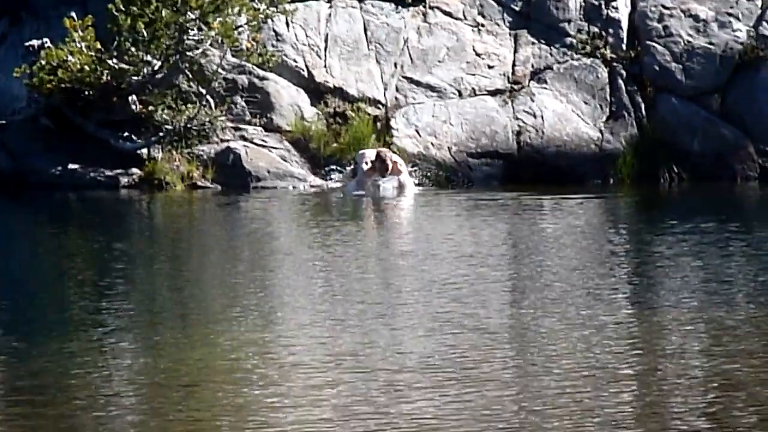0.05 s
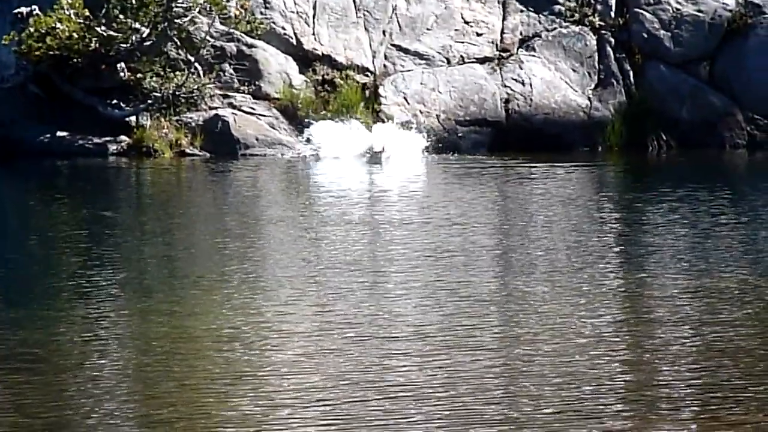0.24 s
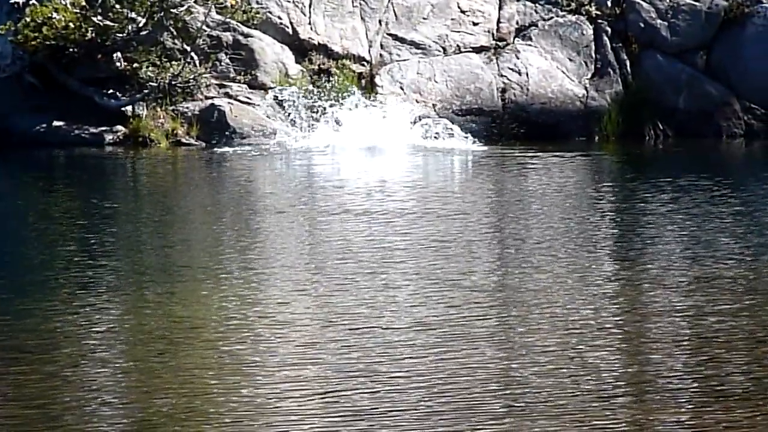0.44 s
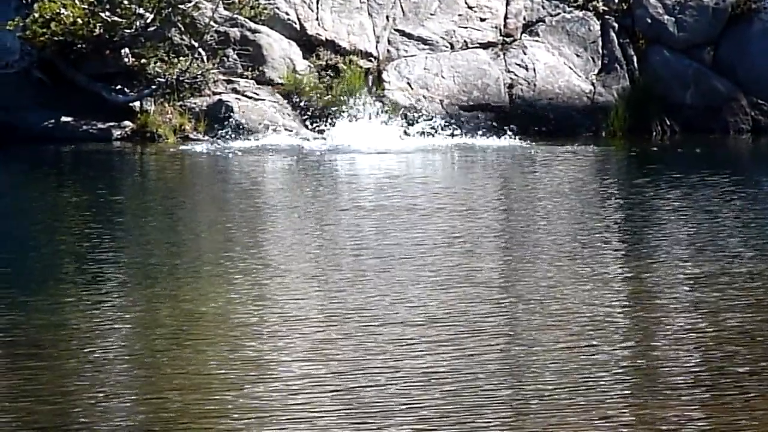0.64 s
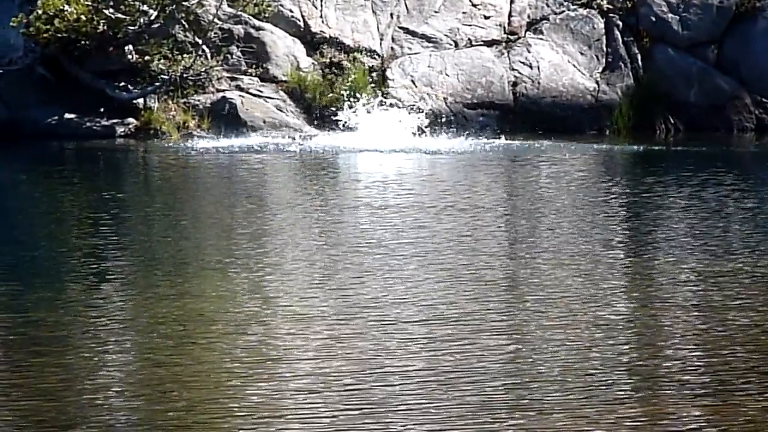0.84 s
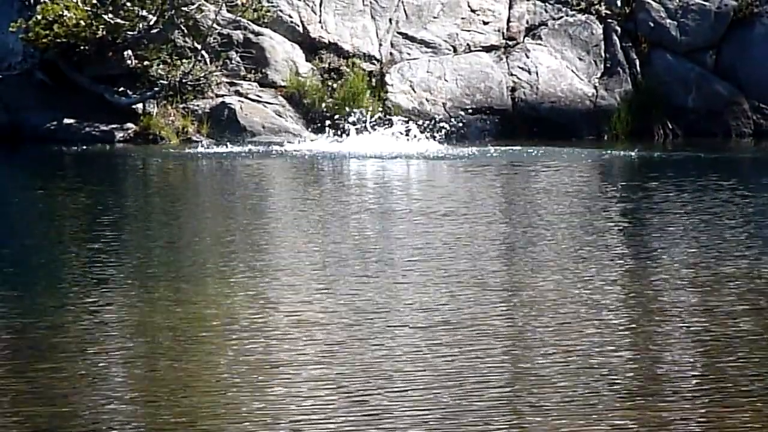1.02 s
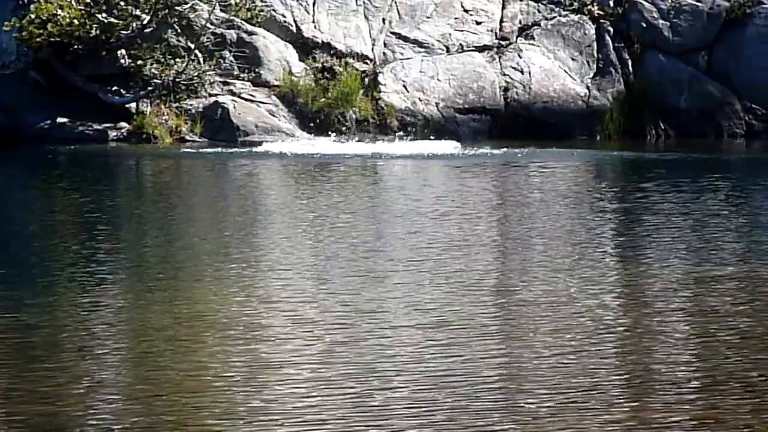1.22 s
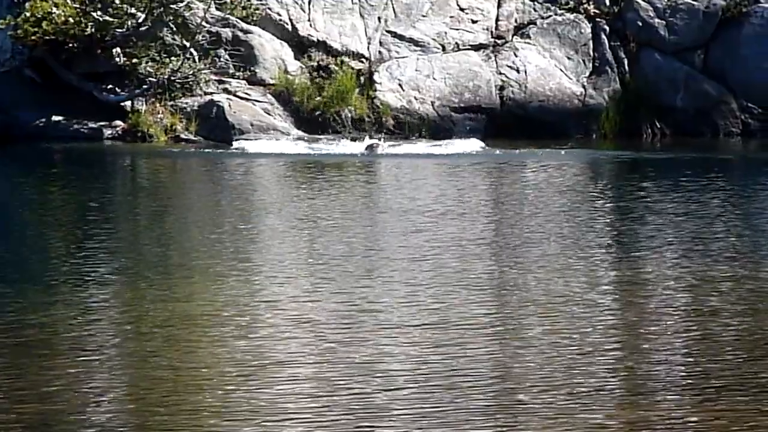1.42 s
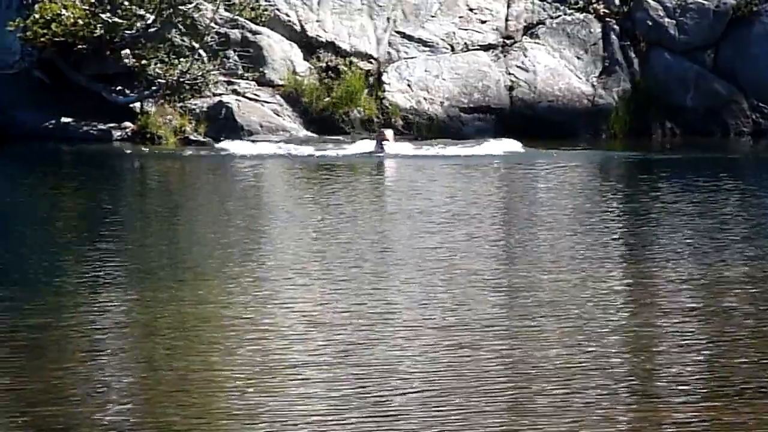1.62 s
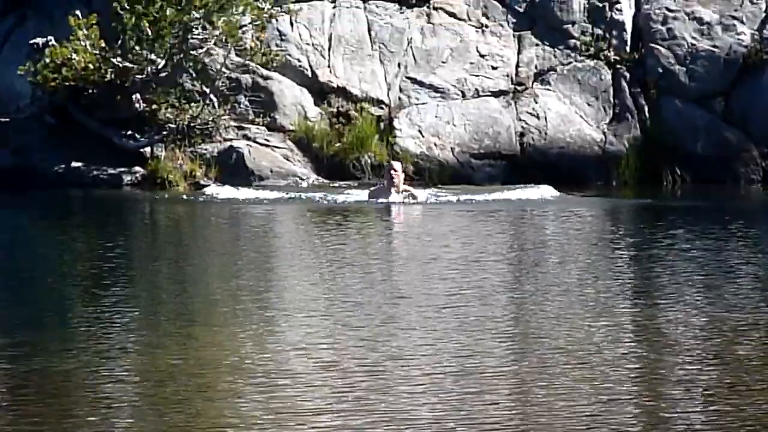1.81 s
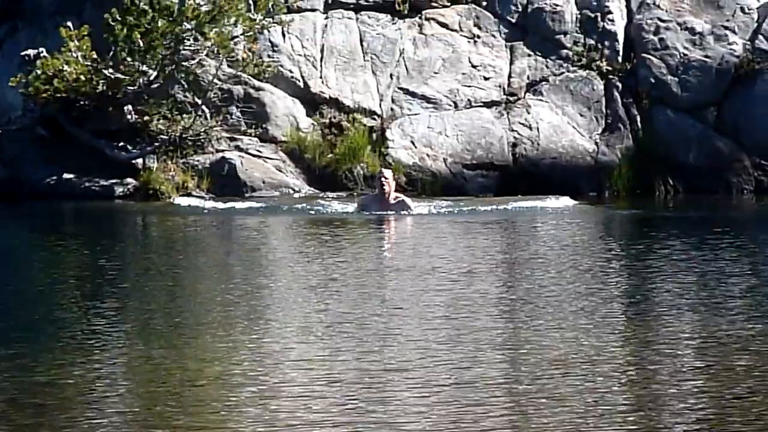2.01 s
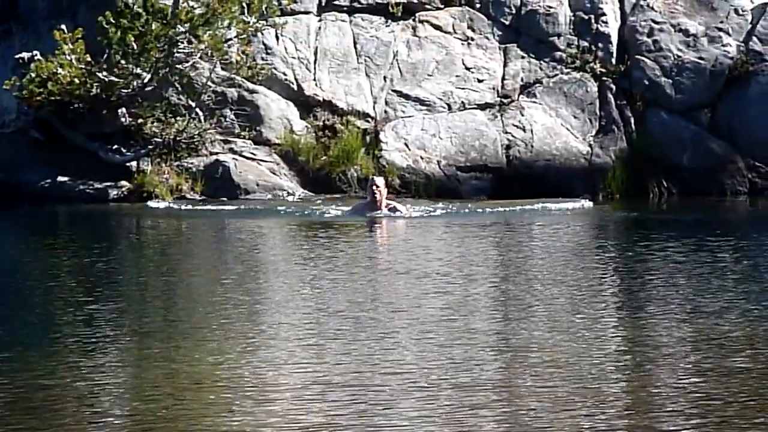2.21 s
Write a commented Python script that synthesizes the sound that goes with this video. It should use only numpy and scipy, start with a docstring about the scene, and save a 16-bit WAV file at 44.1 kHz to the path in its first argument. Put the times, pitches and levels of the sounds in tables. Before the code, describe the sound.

A person splashes into a lake with a sharp smack, heard from across the water. Spray patters down and the churned water gurgles and plops, then thins out over faint running water, with a short echo off rocks.

```python
"""A person plunges into a calm lake below a rock face, heard from across the water.
Running water and a faint breeze set the bed. A few light plops and slaps lead in, then at 0.33 s
the body hits with a crack and the cavity collapses in low gulps. Thrown spray rains back and bubbles
plop in the wash, each sound hollowed by its mirror image off the lake and echoed by the rocks.
The wash thins out, and a puff of air brushes the microphone at the very end."""
import sys
import numpy as np
from scipy import signal
from scipy.fft import rfft, irfft
from scipy.io import wavfile

SR = 44100
rng = np.random.default_rng(int(sys.argv[2]) if len(sys.argv) > 2 else 0)


def unload_wav(signal):
    """Save mono or channel-first audio to the path in sys.argv[1] as 16-bit WAV at rate SR, clipped to [-1, 1]."""
    wavfile.write(
        sys.argv[1],
        SR,
        np.round(np.clip(np.atleast_2d(signal).T, -1, 1) * 32767).astype(np.int16),
    )


N = 103635
T = np.arange(N) / SR
HZ = np.fft.rfftfreq(2 * N, 1 / SR)


def undb(db):
    """Decibels to gain."""
    return 10 ** (np.asarray(db) / 20)


def unit(x):
    """Scale to rms 1."""
    return x / np.sqrt(np.mean(x ** 2))


def fader(points):
    """Gain ride through (t/s, level/dB) points."""
    return undb(np.interp(T, *np.array(points).T))


def eq(x, points):
    """Filter through (f/Hz, level/dB) points."""
    hz, db = np.array(points).T
    gain = undb(np.interp(np.log(HZ + 1), np.log(hz), db))
    return irfft(rfft(x, 2 * N) * gain)[..., :N]


def drift(rate_hz):
    """Slow random modulation with a spread near 1."""
    return np.interp(T * rate_hz, np.arange(400), rng.standard_normal(400))


def add(out, start, sound):
    """Mix a short sound in at its cue time."""
    i = int(np.clip(start * SR, 0, N))
    out[i:i + len(sound)] += sound[:N - i]


def patter(per_s, spread_db):
    """Dense clicks of uneven size, the grain of splashing water."""
    hits = rng.random(N) < per_s / SR
    size = np.minimum(rng.standard_normal(N), 2)
    polarity = np.sign(rng.standard_normal(N))
    return hits * polarity * undb(spread_db * size)


def bubble(hz, decay, attack, rise):
    """A ringing bubble nears the surface: its pitch climbs by the share `rise` per decay time."""
    t = np.arange(int(7 * decay * SR)) / SR
    envelope = (1 - np.exp(-(t / attack) ** 2)) * np.exp(-t / decay)
    phase = 2 * np.pi * hz * t * (1 + rise * t / decay / 2)
    return envelope / envelope.max() * np.sin(phase)


# Tone of a bubble cloud: f/Hz, level/dB
CLOUD_EQ = [(100, -5), (420, -4.5), (680, 2.5), (900, -1.5), (1200, 2.5), (3000, 4)]
def bubble_cloud(per_s, centre_hz, octaves, decay_cycles, spread_db):
    """Bubbles of many sizes ring at random times, the small ones higher and shorter; rms 1."""
    out = np.zeros(N)
    starts = rng.random(8000) * N / SR
    scatter = np.clip(rng.standard_normal((8000, 2)), -2.5, [2.5, 1.7])
    for start, (pitch, level) in zip(starts[:int(per_s * N / SR)], scatter):
        hz = centre_hz * 2 ** (octaves * pitch)
        ring = bubble(hz, decay=decay_cycles / hz, attack=0.5 / hz, rise=0.07)
        add(out, start, undb(spread_db * level) * ring)
    return unit(eq(out, CLOUD_EQ))


# Low rumble of air on the microphone: f/Hz, level/dB
BREEZE_EQ = [(20, -5), (60, 15), (150, 27), (260, 14), (600, -38), (2000, -70)]
def breeze(level_db=-75.5, gust_db=4, puff_db=-51, puff_at_s=2.342, puff_width_s=0.012):
    """Light air buffets each microphone port, with one stronger puff."""
    gusts = undb(level_db + gust_db * drift(rate_hz=21))
    puff = undb(puff_db) * np.exp(-0.5 * ((T - puff_at_s) / puff_width_s) ** 2)
    return (gusts + puff) * unit(eq(rng.standard_normal((2, N)), BREEZE_EQ))


# Tone of the rushing water: f/Hz, level/dB
RUSH_EQ = [(30, -33), (120, -33), (220, -11.5), (340, -5), (680, 0.5), (930, -8.5), (1220, -5),
           (1500, -10.5), (2100, -10), (3200, -11), (6000, -16), (10000, -20), (15500, -26.5)]
# Stereo width of the rush, side over mid: f/Hz, level/dB
RUSH_WIDTH = [(100, 1), (350, 1.5), (650, 0.5), (950, 8.5), (1200, 5.5), (2000, 7.5), (3000, 4), (4500, 4),
              (7000, 2.5), (11000, 0.5), (15000, 1)]
def stream(rush_db=-53.5, flicker_db=0.26, trickle_db=-60, right_lag_s=0.000053):
    """A bed of running water: a wide rush with small bubbles trickling off to the left."""
    def rush():
        gain = undb(rush_db + flicker_db * drift(rate_hz=13.84))
        return gain * unit(eq(patter(per_s=12000, spread_db=2.5), RUSH_EQ))

    mid, side = rush(), eq(rush(), RUSH_WIDTH)
    cloud = bubble_cloud(per_s=500, centre_hz=652, octaves=0.601, decay_cycles=2.06, spread_db=8)
    trickle = undb(trickle_db) * cloud
    late_trickle = np.interp(T - right_lag_s, T, trickle)
    return np.array([mid + side + trickle, mid - side + late_trickle])


def lake_mirror(x, delay_s=0.001717, gain=0.62, cutoff_hz=2880):
    """The surface adds a close, duller reflection that comb-filters the sound hollow."""
    reflection = gain * np.exp(-2j * np.pi * HZ * delay_s) / (1 + (HZ / cutoff_hz) ** 2)
    return irfft(rfft(x, 2 * N) * (1 + reflection))[:N] / np.hypot(1, gain)


def rock_echo(x, t60_s=0.66, build_s=0.0032):
    """The rocks scatter a short, diffuse tail to both sides; wet signal only."""
    envelope = np.exp(-np.log(1000) * T / t60_s) * (1 - np.exp(-T / build_s))
    tail = unit(rng.standard_normal((2, N)) * envelope) / np.sqrt(N)
    wet = signal.fftconvolve(x[None], tail, axes=1)[:, :N]
    return eq(wet, [(600, -11.5), (3000, -8.5)])


# Swells as cavities open and close: t/s, level/dB, width/s
GULP_CUES = [(0.322, -54, 0.023), (0.436, -55, 0.052), (0.614, -59, 0.044), (0.75, -51.5, 0.065),
             (1.121, -58, 0.075), (1.48, -63, 0.019)]
# Dark body of a gulp: f/Hz, level/dB
GULP_EQ = [(25, -48), (60, -23), (110, -11), (190, -6.5), (290, 6), (700, -15), (2000, -48)]
def gulps():
    """The low end: heavy water closes over the cavities with a soft rumble."""
    swell = sum(undb(db) * np.exp(-0.5 * ((T - at) / width) ** 2) for at, db, width in GULP_CUES)
    return swell * unit(eq(rng.standard_normal(N), GULP_EQ))


# Surges of the churned water: t/s, level/dB
CHURN_RIDE = [(.15, -70), (.22, -56), (.29, -51), (.37, -45), (.48, -50.5), (.62, -52), (.76, -46),
              (.92, -49), (1.07, -52), (1.31, -49), (1.48, -54), (1.68, -66.5), (2.02, -54), (2.2, -60.5),
              (2.35, -83)]
def churn():
    """The churned water fizzes and gurgles with small bubbles."""
    cloud = bubble_cloud(per_s=1400, centre_hz=801.3, octaves=0.539, decay_cycles=4.47, spread_db=0)
    return fader(CHURN_RIDE) * cloud


# Showers of falling drops: t/s, level/dB
SPRAY_RIDE = [(0, -72), (.28, -54), (.38, -46), (.46, -65.5), (.6, -57), (.72, -50), (.85, -45.5),
              (.95, -48.5), (1.08, -55), (1.2, -52.5), (1.32, -49), (1.5, -59), (1.7, -60), (1.95, -60.5),
              (2.35, -76)]
# Bright tone of drops on water: f/Hz, level/dB
SPRAY_EQ = [(60, -24.5), (250, -34), (600, -29), (1200, 3.5), (2200, -3), (3300, -1.5), (5000, -11.5),
            (9000, -17.5), (16000, -28)]
def spray():
    """Thrown spray rains back on the lake, a tick for each drop."""
    return fader(SPRAY_RIDE) * unit(eq(patter(per_s=4600, spread_db=-4), SPRAY_EQ))


# Air pockets, from deep collapsing cavities to small plops: t/s, f/Hz, level/dB, decay/s
PLOP_CUES = [(.042, 560, -50.5, 0.0017), (.14, 748, -42, 0.0087), (0.197, 467, -41.5, 0.012),
             (.326, 390, -33, 0.0023), (.329, 1140, -28.5, 0.0027), (.3412, 625, -29.5, 0.0065),
             (.375, 1145, -43, 0.02), (.444, 576, -36, 0.0086), (.519, 622, -39, 0.0025),
             (.598, 663, -39.5, 0.0085), (.655, 91, -66, .028), (.711, 590, -41, 0.017),
             (0.712, 205, -51, 0.008), (.735, 118, -66, 0.03), (.758, 1150, -45.5, 0.037),
             (0.777, 261, -44.5, 0.016), (0.799, 147, -59, 0.027), (0.825, 1103, -39.5, 0.0077),
             (.865, 547, -38, 0.0091), (0.929, 166, -58, .008), (.99, 575, -41, 0.0098),
             (1.102, 710, -51, 0.0042), (1.1515, 625, -35.5, 0.0023), (1.187, 596, -41, 0.0085),
             (1.286, 540, -42.5, 0.0094), (1.315, 1163, -43, 0.0091), (1.657, 1660, -46.5, 0.0032),
             (1.83, 830, -42, 0.0035), (1.971, 1260, -45, .006), (2.02, 1194, -52, 0.0056),
             (2.272, 1670, -50.5, 0.0027)]
def plops():
    """Each trapped air pocket rings as one short, rising note."""
    out = np.zeros(N)
    for start, hz, db, decay in PLOP_CUES:
        add(out, start, undb(db) * bubble(hz, decay, attack=0.001, rise=0.0605))
    return out


# Hits of the body and of thrown water on the surface: t/s, level/dB, decay/s
SLAP_CUES = [(0.171, -47, 0.017), (0.305, -48, 0.017), (0.3266, -32.5, 0.013), (.341, -37, 0.018),
             (0.358, -42, 0.02), (0.811, -46, 0.084), (0.942, -45.5, 0.014), (1.021, -50, 0.022),
             (1.285, -59, .014), (1.318, -47, 0.018), (1.446, -49, 0.019)]
# Midrange smack of a slap: f/Hz, level/dB
SLAP_EQ = [(100, -39), (400, -9.5), (700, 7.5), (1200, 1), (2200, -3.5), (3500, 1.5), (6000, -8.5),
           (10000, -15.5), (16000, -24)]
def slaps(attack_s=0.00094):
    """Each slap on the surface bursts into a dense crackle that dies quickly."""
    envelope = np.zeros(N)
    for start, db, decay in SLAP_CUES:
        age = np.maximum(T - start, 0)
        envelope += undb(db) * (1 - np.exp(-age / attack_s)) * np.exp(-age / decay)
    return envelope * unit(eq(patter(per_s=16000, spread_db=0.5), SLAP_EQ))


def crack(at_s=0.329, peak_db=-26, width_s=0.00006):
    """The main transient: one sharp pressure pulse as the body meets the surface."""
    offset = (T - at_s) / width_s
    return undb(peak_db) * offset * np.exp(0.5 - 0.5 * offset ** 2)


def scene():
    """The splash carries across the lake and off the rocks, over running water and a breeze."""
    splash = lake_mirror(crack() + slaps() + spray() + churn() + plops() + gulps())
    return splash + rock_echo(splash) + stream() + breeze()


def record(dry):
    """The camera's microphone thins the deep bass and cuts the top."""
    low_cut = signal.butter(2, 45, "high", fs=SR, output="sos")
    high_cut = signal.ellip(12, 0.1, 70, 15800, fs=SR, output="sos")
    return signal.sosfilt(high_cut, signal.sosfilt(low_cut, dry))


dry = scene()
out = record(dry)
unload_wav(out)
```